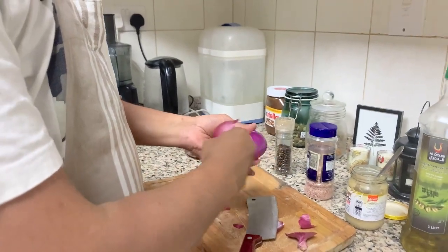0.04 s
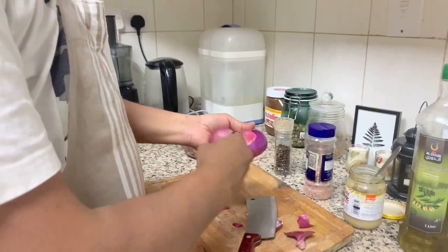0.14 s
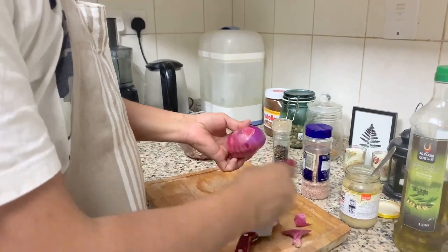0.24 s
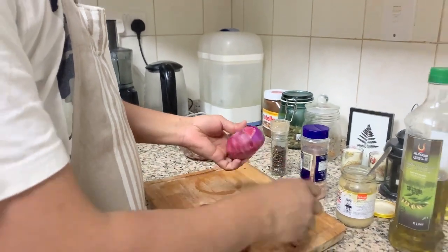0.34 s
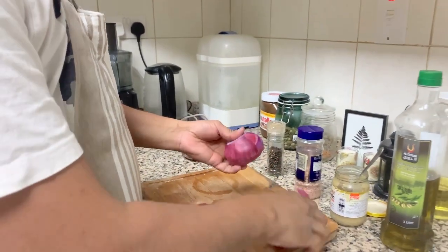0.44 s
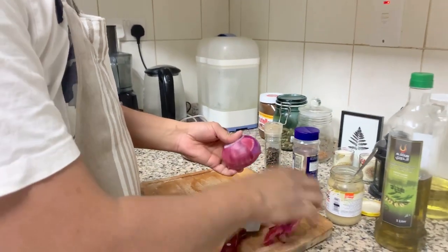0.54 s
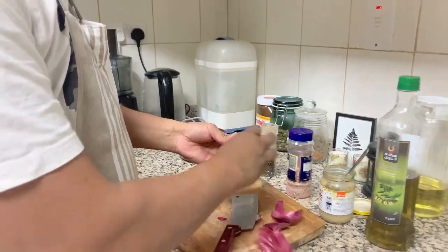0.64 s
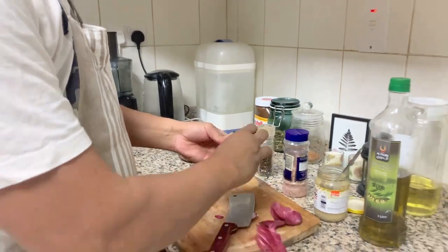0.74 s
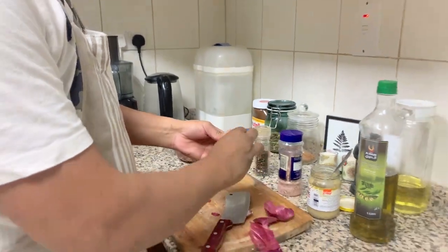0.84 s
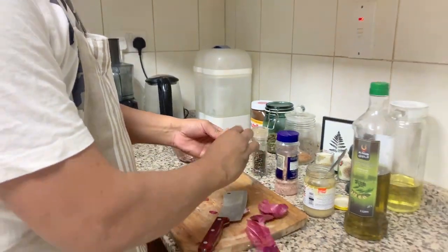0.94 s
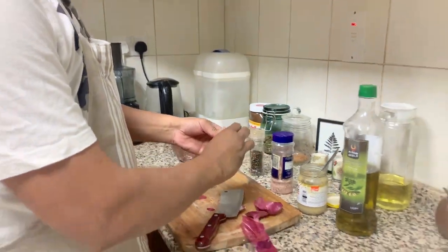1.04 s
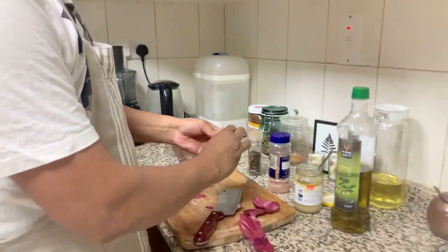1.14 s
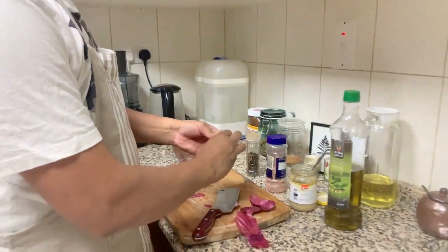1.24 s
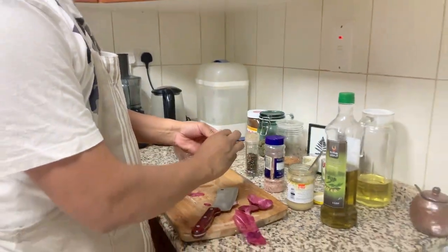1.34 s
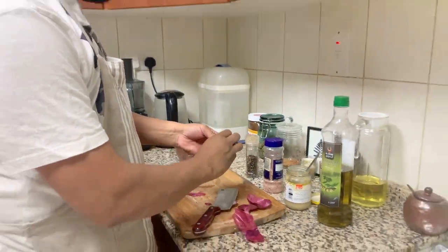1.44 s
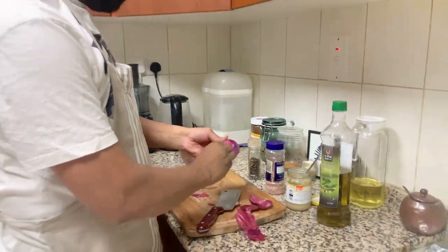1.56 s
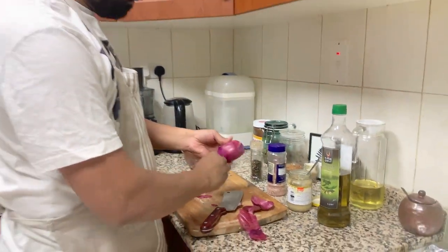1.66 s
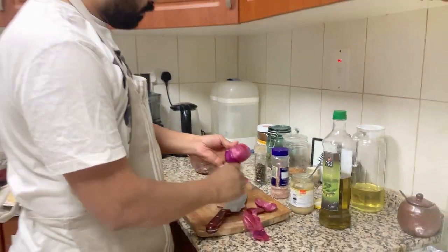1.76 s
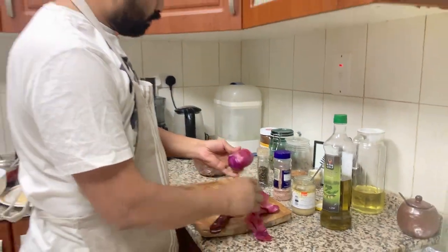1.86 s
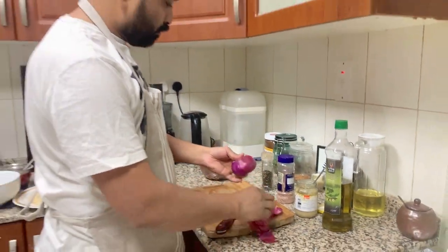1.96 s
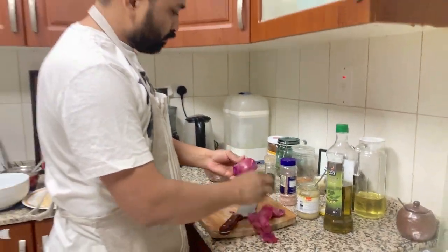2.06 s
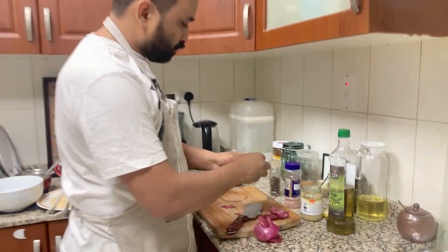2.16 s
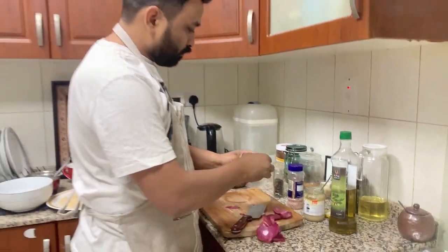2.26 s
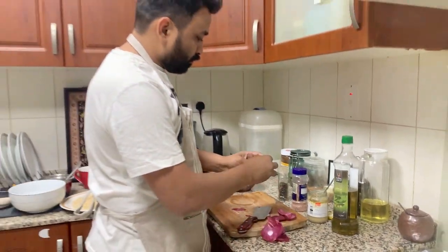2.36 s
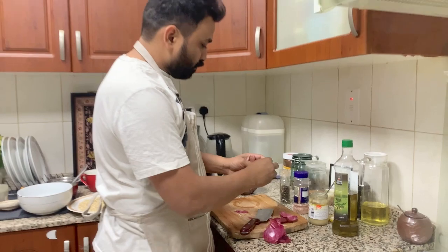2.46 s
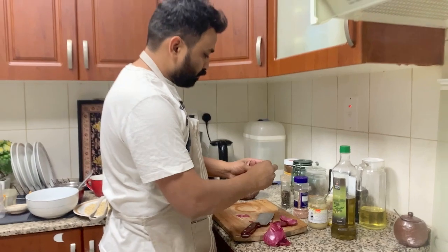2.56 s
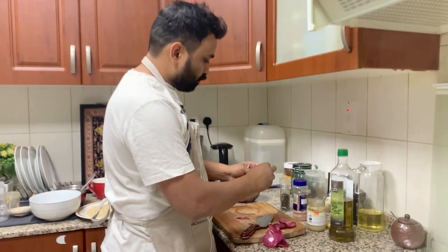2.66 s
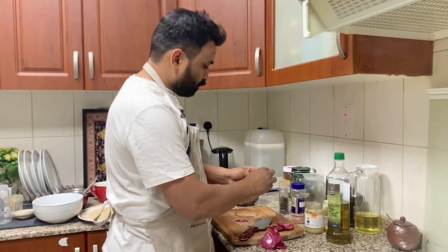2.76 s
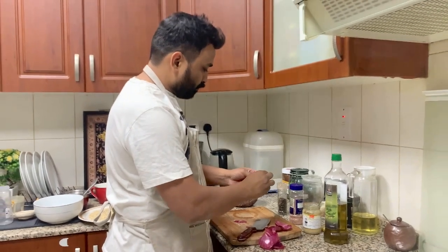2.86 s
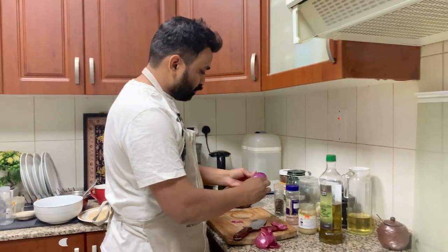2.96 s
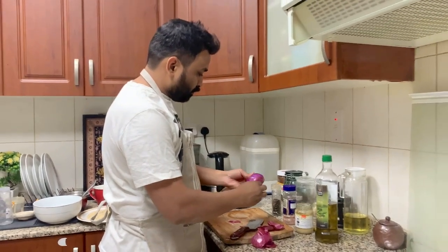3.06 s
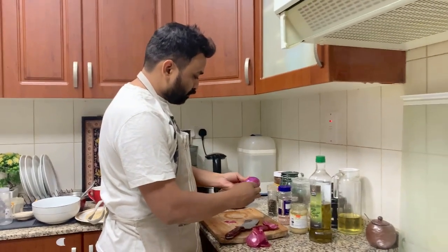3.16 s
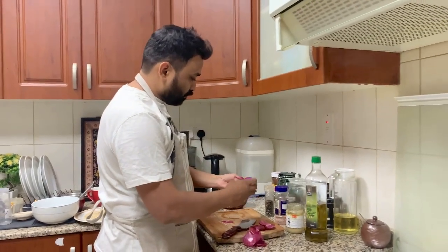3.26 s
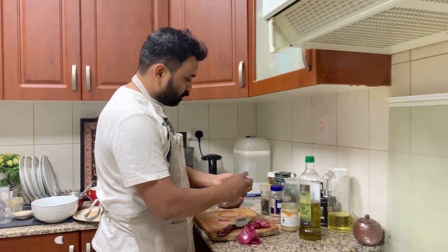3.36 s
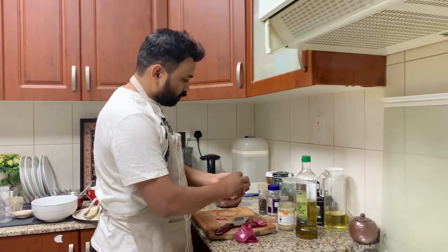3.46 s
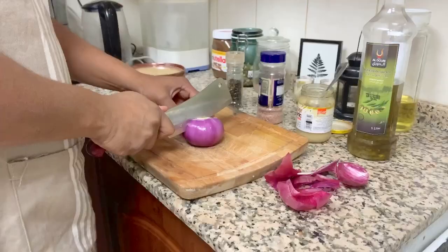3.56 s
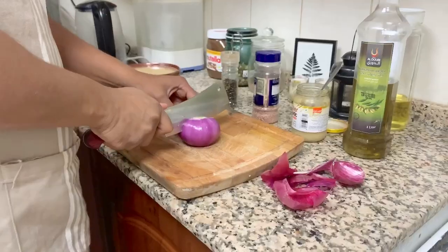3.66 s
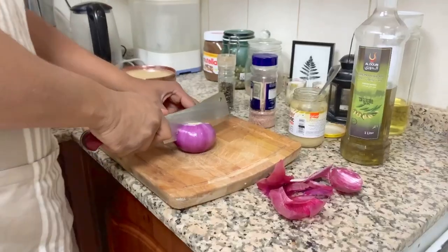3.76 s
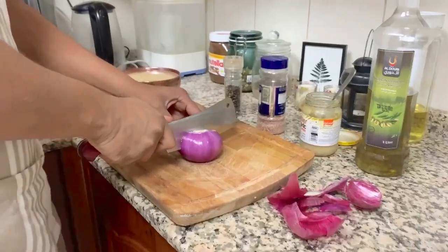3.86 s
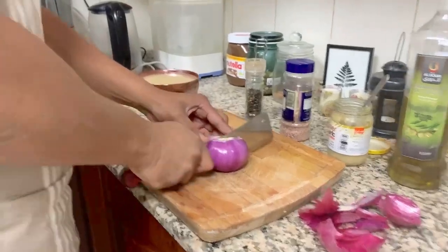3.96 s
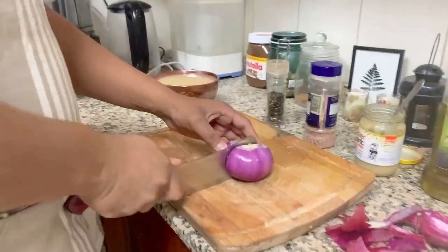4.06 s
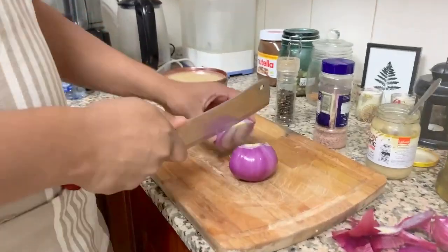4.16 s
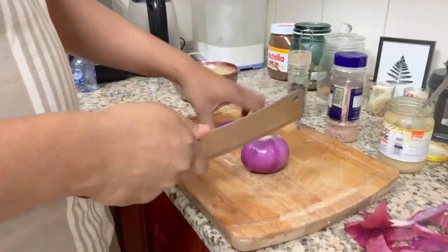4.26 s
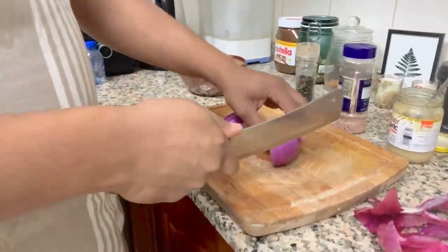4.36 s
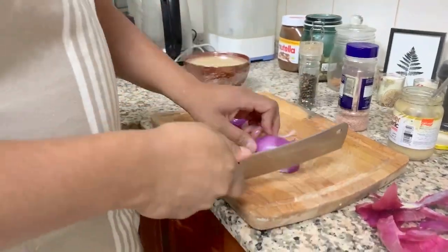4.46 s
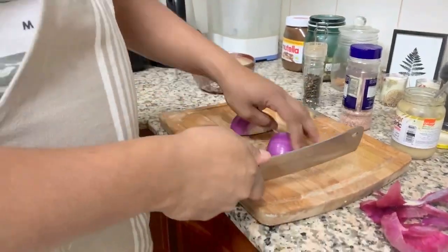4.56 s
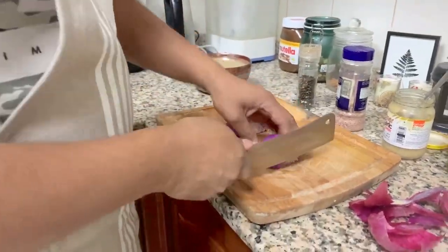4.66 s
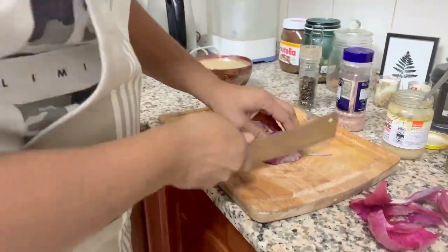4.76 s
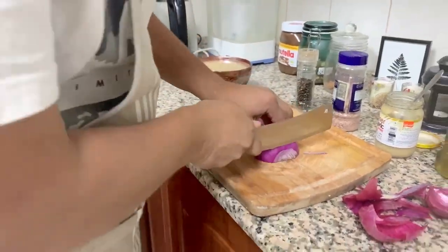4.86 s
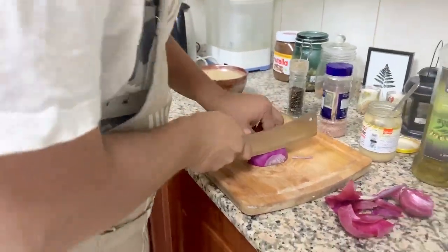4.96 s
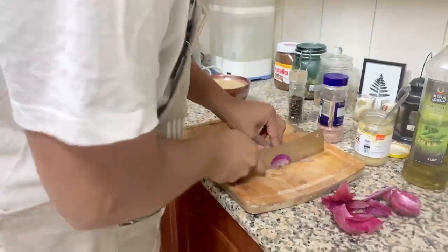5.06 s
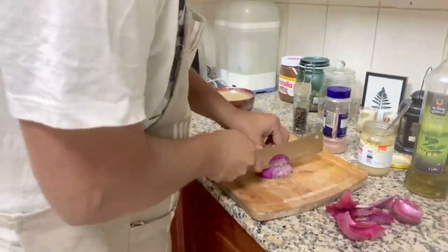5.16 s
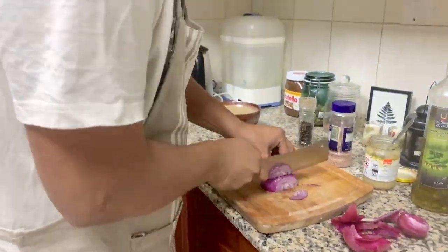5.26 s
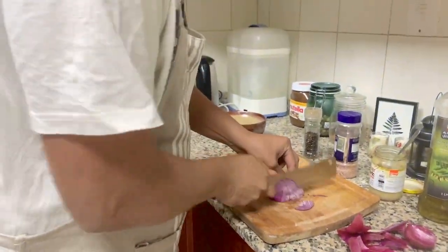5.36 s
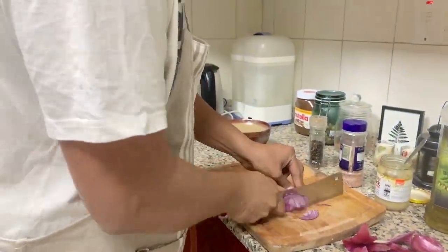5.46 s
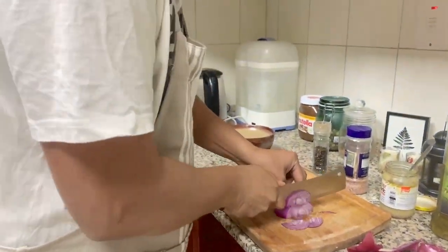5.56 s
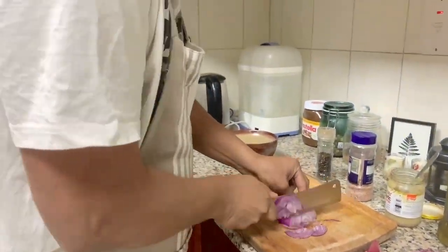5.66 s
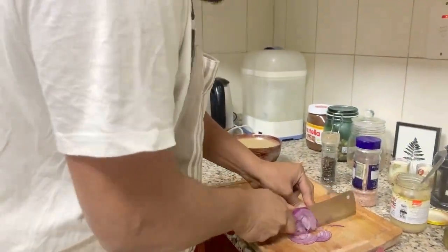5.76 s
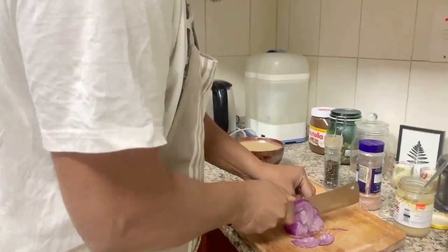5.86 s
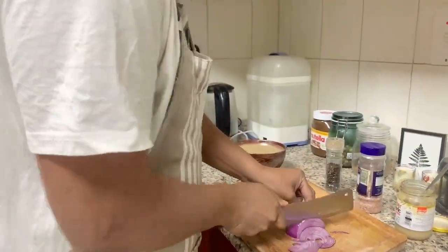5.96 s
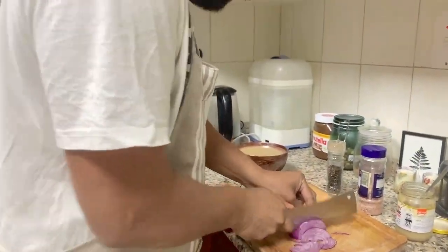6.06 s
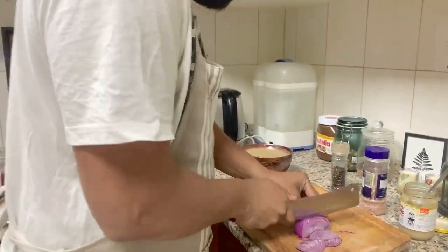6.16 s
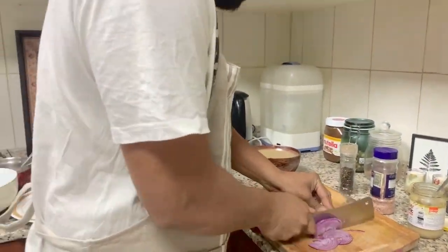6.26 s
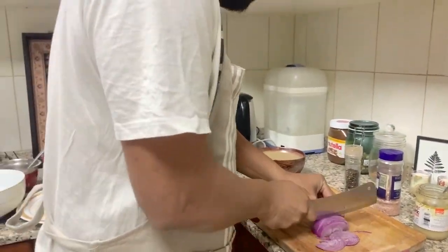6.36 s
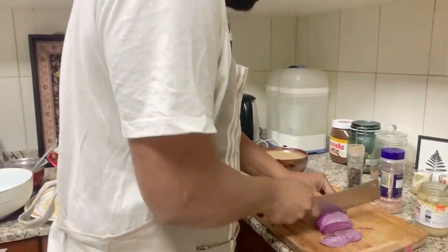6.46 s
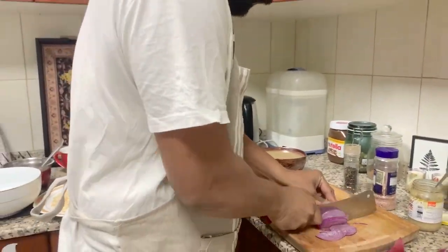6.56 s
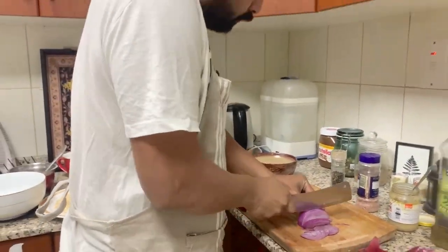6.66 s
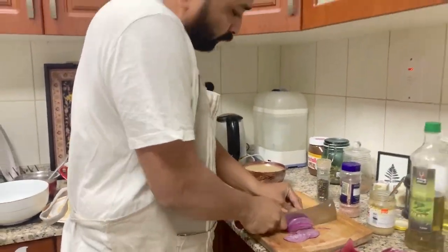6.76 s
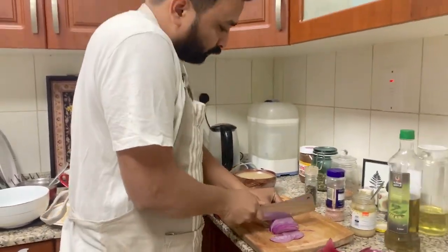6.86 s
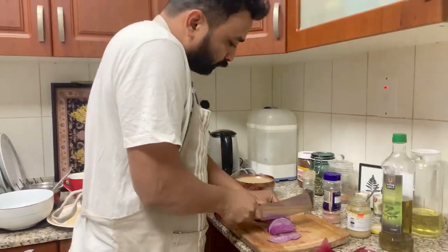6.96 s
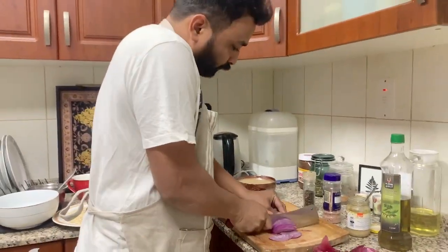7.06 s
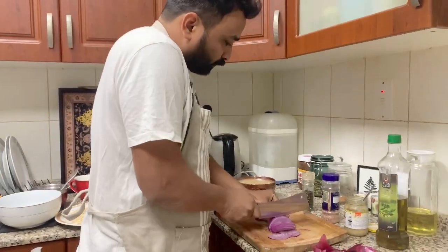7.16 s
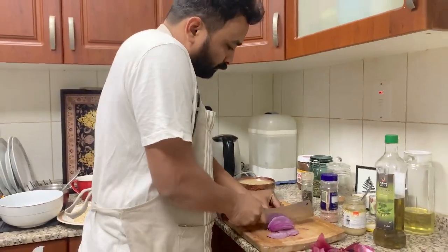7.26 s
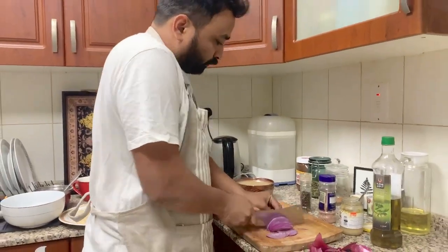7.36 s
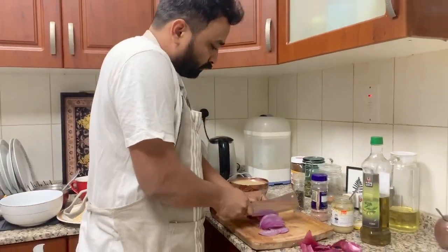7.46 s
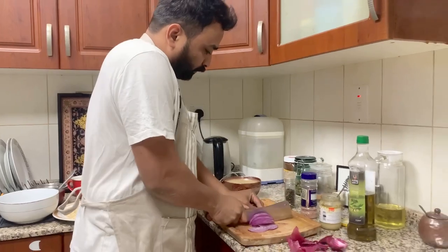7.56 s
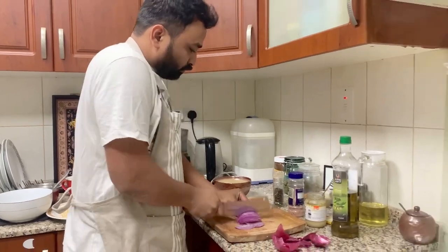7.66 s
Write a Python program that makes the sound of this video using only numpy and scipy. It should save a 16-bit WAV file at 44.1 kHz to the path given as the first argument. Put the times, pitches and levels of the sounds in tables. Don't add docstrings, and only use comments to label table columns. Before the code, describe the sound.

From 0 to 3.4 seconds, a small hard-walled kitchen carries a steady low fan hum and airy hiss. Dry onion skin gives small flaky cracks at the start, a sharp snap near 0.5, then a cluster of loud snaps and grainy tearing around 1.4 to 1.5. Sparser, mostly faint crackles follow, with clearer ones near 2.4 and 3.25. Silence falls briefly at 3.45 to 3.5, then closer, drier room air returns. Faint brushing leads to a chop at 3.8, with dull board touches there, at 3.95 and at 4.4. From 4.95 cuts come quickly, about six or seven a second: wet crunch, bright steel ring, woody thump, hardest near 5.24, 5.67 and 6.3, squashed by limiting. After 6.5 the blows slow, with tiny ticks between, at about 6.65, 6.97, 7.2 and a last one near 7.45.

```python
import sys
import numpy as np
from scipy import signal
from scipy.io import wavfile
from scipy.ndimage import uniform_filter1d

SR = 44100
rng = np.random.default_rng(int(sys.argv[2]) if len(sys.argv) > 2 else 0)


def store_pcm(level_fs):
    pcm = np.round(np.clip(level_fs, -1, 1) * 32767).astype(np.int16)
    wavfile.write(sys.argv[1], SR, np.atleast_2d(pcm).T)


def ratio(d):
    e = np.asarray(d, float) / 20
    return 10 ** e


N = 339992

# start t/s, rise t/s, fall t/s, level/dB, centre f/Hz
TEARS = [(0, .002, .031, -41.5, 4000), (0.245, .012, .006, -50.5, 4460), (0.43, .008, .006, -47.5, 4000),
         (.665, .015, .03, -60, 6000), (0.998, .01, .08, -54, 5000), (1.132, .012, .015, -57, 7000),
         (1.215, .03, .015, -53, 5960), (1.345, .04, .004, -50, 4000), (1.383, .012, .125, -30.5, 2600),
         (1.438, .045, .11, -29, 2500), (1.384, .09, .145, -34.5, 6960), (1.791, .016, .043, -55, 4970),
         (1.883, .04, .097, -55.5, 4100), (2.132, .018, .01, -60, 4460), (2.711, .043, .125, -35.5, 5360),
         (3.05, .028, .05, -63.5, 5960), (3.336, .018, .13, -48, 5250)]
# t/s, peak level/dB, ring f/Hz, share to the room level/dB
FLAKES = [
    (0.0014, -24, 1900, -4.5),
    (0.0945, -19, 2460, -7.5),
    (0.281, -35, 1930, -6),
    (0.9153, -42, 1910, 1.5),
]
# t/s, peak level/dB, flake ring f/Hz, share to the room level/dB
SNAPS = [(0.4673, -10.5, 2750, -9.5), (0.9943, -28, 2870, -11), (1.0306, -31.5, 2290, -10),
         (1.252, -42, 5700, 3), (1.3443, -34.5, 2770, 4), (1.3763, -29.5, 3820, 3), (1.3876, -7, 2600, 1),
         (1.4674, -11, 2600, 3), (1.8122, -34.5, 2850, 1), (2.1386, -42, 4740, -6), (2.4065, -19, 6200, -7),
         (3.118, -39, 7300, -3), (3.248, -17, 2300, -15), (3.3573, -26, 4530, -0.5)]
# t/s, peak level/dB, ring f/Hz, share to the room level/dB
TICKS = [
    (3.5513, -32, 9980, -3),
    (4.8738, -32, 5260, -9),
    (6.2619, -27.5, 6330, -1),
    (6.5413, -38, 6060, 0),
    (6.569, -30, 7080, -3),
    (6.8493, -33, 5087, -7),
    (6.8904, -40.5, 8206, 7),
    (7.117, -33.5, 10400, 0),
    (7.3674, -34, 10800, -3),
]
# start t/s, rise t/s, fall t/s, level/dB, centre f/Hz
BRUSHES = [
    (3.605, .016, .018, -45, 11000),
    (3.678, .014, .01, -48.5, 8500),
    (3.735, .02, .04, -50, 2800),
    (3.918, .026, .016, -41.5, 6900),
    (4.374, .006, .022, -49, 7000),
    (4.428, .016, .016, -53, 10000),
]
# start t/s, crunch level/dB, centre f/Hz, board load level/dB
CUTS = [(3.806, -36, 9000, -57), (4.942, -27, 6500, -30.5), (5.07, -34, 7000, -38), (5.19, -50, 13000, -37),
        (5.222, -26.5, 6500, -27), (5.335, -32, 8500, -35), (5.46, -35, 8700, -36.5),
        (5.48, -26.5, 7000, -28.5), (5.628, -38, 8300, -43), (5.778, -30.5, 7500, -33),
        (5.945, -31.5, 7500, -38.5), (6.108, -28, 12000, -31), (6.26, -39, 9000, -54),
        (6.286, -29.5, 7120, -32), (6.42, -31.5, 8500, -35.5), (6.598, -28.5, 11000, -33),
        (6.918, -31.5, 11000, -37), (7.135, -33.5, 8000, -37), (7.385, -35, 8000, -39)]
# t/s, steel ring level/dB, wood knock level/dB, edge tick level/dB
CHOPS = [(3.8324, -16, -34, -22.5), (4.9628, -10.5, -27, -25.5), (5.103, -16, -26, -20.5),
         (5.238, 4, -23.5, -2.5), (5.3772, -22, -26.5, -23.5), (5.4986, -6.5, -27, -21),
         (5.667, -1, -27.5, -5.5), (5.8116, -30.5, -29, -29.5), (5.9889, -15, -23, -16),
         (6.1535, -28.5, -29, -30.5), (6.3119, 2, -24, -5), (6.4728, -43, -32, -30),
         (6.6447, -23.5, -27, -19), (6.9736, -26, -29, -20), (7.21, -22, -27, -16.5),
         (7.4587, -21, -25, -18)]
# t/s, peak level/dB, pitch factor
SET_DOWN = [
    (3.834, -20, 1.6),
    (3.948, -28, .92),
    (4.379, -21, 1),
]

# f/Hz, width f/Hz, level/dB
STEEL = [(3213, 290, 2), (4110, 176, 1.5), (4400, 181, 6.5), (4550, 640, -1.5), (6470, 437, 4.5),
         (6776, 84, -3), (7990, 180, -12.5), (9980, 3400, -15.5)]
WOOD = [(495, 103, -8), (732, 173, -7), (1304, 390, -4.5), (2086, 270, -0.5), (2600, 400, 1.5),
        (3260, 700, 0), (4606, 540, 0.5), (6110, 140, -6.5)]
BOARD = [(172.2, 24.6, -4.5), (266.6, 33, -0.5), (349, 66, -8.5), (526, 90, -9.5)]
KNOCK = [(255, 66, 4), (490, 86, 6.5), (770, 154, 2), (1300, 300, -3), (2370, 700, -9)]

# f/Hz, level/dB per Hz
FAR_AIR = [(15, -58), (25, -12), (48, -7), (108, -8.5), (153, -10), (195, -23.5), (301, -13.5), (335, -29),
           (373, -21), (545, -24), (714, -25), (887, -25.5), (1290, -23), (1940, -33.5), (16000, -63)]
NEAR_AIR = [(15, -89), (25, -48), (76, -15), (130, -12), (190, -5), (285, -12), (344, -8.5), (624, -18),
            (818, -14.5), (1440, -25.5), (2110, -24.5), (3820, -27.5), (4740, -23), (6920, -34),
            (16000, -40)]
# f/Hz, level/dB
FAR_TREBLE = [(2000, -4), (4000, 0.5), (7500, 4), (9800, -6), (16000, 9)]
# f/Hz, width f/Hz, level/dB
FAR_HUM = [(50.8, 3.7, -52.5), (98, 8.9, -58), (227.4, 13.6, -62), (1277, 89, -63)]
NEAR_HUM = [(184.7, 14, -51.5), (351, 5, -57.5), (476.4, 35, -60.5), (811, 30, -68), (4100, 110, -68),
            (4670, 90, -65)]
# f/Hz, t/s
FAR_ROOM = [(200, 0.49), (1000, 0.57), (3000, 0.45), (7000, 0.43), (14000, 0.13)]
NEAR_ROOM = [(200, 0.17), (1000, 0.18), (3000, 0.15), (7000, 0.16), (14000, .14)]
# t/s, level/dB
ECHOES = [(.0052, -4), (.0081, -8), (0.0127, -6.5), (.016, -12), (.0215, -15)]
# start t/s, end t/s
GAP = (3.445, 3.502)


def evened(x):
    return x / np.sqrt(np.mean(x ** 2) + 1e-20)


def blend(parts):
    return sum(ratio(db) * x / np.linalg.norm(x) for db, x in parts)


def read(points, hz):
    f, value = np.transpose(points)
    return np.interp(np.log(hz + 1), np.log(f + 1), value)


def add(mix, s, sound):
    part = mix[max(round(s * SR), 0):][:len(sound)]
    part += sound[:len(part)]


def lay_out(sounds):
    direct, feeds = np.zeros(N), np.zeros((3, N))
    for k, (s, (near, wet)) in enumerate(sounds):
        add(direct, s, near)
        add(feeds[k % len(feeds)], s, wet)
    return direct, feeds


def resonate(x, hz, width):
    pole = np.exp((2j * np.pi * hz - np.pi * width) / SR)
    return 2 * signal.lfilter([1 - abs(pole)], [1, -pole], x).real


def resonate_twice(x, hz, width):
    return resonate(resonate(x, hz, width), hz, width)


def body(x, modes):
    return sum((-1) ** k * ratio(db) * resonate(x, hz, w) for k, (hz, w, db) in enumerate(modes))


def air(spectrum, treble, db, hum):
    frames, hz = N // 512 + 5, np.fft.rfftfreq(2048, 1 / SR)
    a, b, patches = rng.standard_normal((3, len(hz), frames))
    patches = uniform_filter1d(patches, size=20, axis=0)
    patches = evened(uniform_filter1d(patches, size=8, axis=1))
    colour_db = (read(spectrum, hz) + read(treble, hz))[:, None]
    z = (a + 1j * b) * ratio(colour_db + 1.7 * patches)
    wash = signal.istft(z, nperseg=2048, noverlap=1536)[1][:N]
    tones = sum(ratio(d) * evened(resonate_twice(rng.standard_normal(N), f, w)) for f, w, d in hum)
    return ratio(db - 2.5) * evened(wash) + tones


def stroke(start, loudest, end, power, hold=0):
    t = np.arange(start, end, 1 / SR)
    loudest = np.clip(loudest, start + 0.00086, end - .001)
    return np.interp(t, [start, loudest, end], [0, 1, hold]) ** power


def crackle(length, per_s, spread_db):
    size_draw, when_draw, push = rng.random((3, length))
    size = ratio(-spread_db * np.log(size_draw + 0.0101))
    return evened(size * (when_draw < per_s / SR) * (push - .5))


def rip(start, rise, fall, db, hz, width):
    shape = stroke(start, start + rise, start + rise + fall, 1.12)
    grains = resonate_twice(crackle(len(shape), 4000, 4.8), hz, 1.43 * width)
    sound = ratio(db - 4) * shape * evened(grains)
    return sound, sound


def snap(db, ring_hz, ring_db, bright_db, wet_db):
    t = np.arange(900) / SR
    click = 1. * (t == 0)
    crack = 1.1 * click + rng.standard_normal(len(t)) * np.exp(-t / .0011)
    dull = signal.butter(3, [.24 * ring_hz, 7600], "band", fs=SR)
    broad_hz = 4300 * (ring_hz / 2800) ** 0.49

    def flake(x):
        broad = signal.lfilter(*dull, resonate(resonate(x, broad_hz, 5600), broad_hz, 5400))
        ring = signal.lfilter(*dull, resonate(x, ring_hz, 560))
        edge = resonate_twice(x, 14000, 9000)
        return blend([(0, broad), (ring_db, ring), (bright_db + 4, edge)])

    near, clean = flake(crack), flake(click)
    near *= ratio(db + 1.0) / abs(near).max()
    return near, ratio(wet_db) * clean * np.linalg.norm(near) / np.linalg.norm(clean)


def peeling():
    sounds = [(row[0], rip(*row, width=.92 * row[-1])) for row in TEARS]
    for s, db, hz, wet_db in FLAKES:
        sounds.append((s, snap(db, hz, 11, -30, wet_db)))
    for s, db, hz, wet_db in SNAPS:
        ring_db = -4.5 + 1.5 * np.log2(hz / 2800)
        edge_db = -27 - .4 * db
        sounds.append((s, snap(db, hz, ring_db, edge_db, wet_db)))
    return lay_out(sounds)


def cut(start, db, hz, load_db):
    end = min(row[0] for row in CHOPS if row[0] > start)
    loudest = start + 0.0061 + .3 * (end - start)
    shape = stroke(start, loudest, end, 0.4, hold=0.34)
    time_left = np.arange(len(shape))[::-1] / SR
    rush = ratio(3.7 * np.exp(-time_left / 0.013))
    grains = crackle(len(shape), 9000, 4.7)
    wet_layers = evened(resonate(grains, hz, 9470)) + 0.091 * evened(body(grains, STEEL))
    crunch = ratio(db - 2.5) * shape * rush * wet_layers
    load = ratio(load_db + 1.0) * shape * evened(body(grains, BOARD))
    return crunch + load, 0.51 * crunch + 0.25 * load


def chop(steel_db, wood_db, tick_db):
    t = np.arange(6000) / SR
    board_db = -6.5 + .7 * wood_db + .33 * tick_db
    chatter, rocking = rng.standard_normal((2, len(t)))
    blow = 1. * (t == 0)
    rough_blow = chatter * np.exp(-(t / 0.0028) ** 4) * np.minimum(t / 0.00026, 1) + np.roll(blow, 8)
    push = np.exp(-((t - .003) / 0.00051) ** 2) + .5 * rocking * np.exp(-t / 0.0063)
    soft = signal.butter(4, 6600, fs=SR)
    thin = signal.butter(4, 2750, "high", fs=SR)
    top = signal.butter(2, [7000, 12500], "band", fs=SR)

    def struck(x):
        return blend([(steel_db + 20.5, signal.lfilter(*thin, body(x, STEEL))),
                      (wood_db + 32, signal.lfilter(*soft, body(x, WOOD))),
                      (board_db + 25, body(push, BOARD)),
                      (tick_db + 15.5, signal.lfilter(*top, resonate(x, 7600, 8700)))])

    return ratio(6.5) * struck(rough_blow), struck(blow)


def knock(db, pitch):
    t = np.arange(3000) / SR
    modes = [(pitch * hz, 1.3 * pitch * width, mode_db) for hz, width, mode_db in KNOCK]
    touch = rng.standard_normal(len(t)) * np.exp(-t / 0.0043) * np.minimum(t / 0.0012, 1)
    sound = body(touch, modes)
    sound *= ratio(db) / abs(sound).max()
    return sound, 0.48 * sound


def cutting():
    sounds = [(row[0], rip(*row, width=0.72 * row[-1])) for row in BRUSHES]
    sounds += [(row[0], cut(*row)) for row in CUTS]
    sounds += [(s, chop(*row)) for s, *row in CHOPS]
    sounds += [(s, knock(*row)) for s, *row in SET_DOWN]
    for s, db, hz, wet_db in TICKS:
        ring_db = -6 + 13 * np.log2(hz / 6500)
        sounds.append((s, snap(db, hz, ring_db, 4, wet_db)))
    return lay_out(sounds)


def room(direct, feeds, decays, gap_s, wet_db, echo_db):
    paths, length = len(feeds), SR // 2
    at = np.arange(round(gap_s * SR), length - 8, 8) + rng.integers(0, 8, (paths, 1))
    at = np.minimum(at + rng.integers(0, 8, at.shape), length - 1)
    taps = np.zeros((paths, length))
    np.put_along_axis(taps, at, rng.choice([-1., 1.], at.shape), 1)
    hz, t, z = signal.stft(taps, SR, nperseg=128)
    fade = ratio(-60 * t / read(decays, hz)[:, None])
    tails = signal.istft(z * fade, SR, nperseg=128)[1]
    tails /= np.linalg.norm(tails, axis=1)[:, None]
    for s, db in ECHOES:
        for tail in tails:
            add(tail, s * rng.uniform(.9, 1.1), ratio(db + echo_db) * np.ones(1))
    wet = signal.fftconvolve(feeds, tails, axes=1)[:, :N].sum(0)
    return direct + ratio(wet_db) * wet


def scene():
    t = np.arange(N) / SR
    skin = room(*peeling(), FAR_ROOM, gap_s=.003, wet_db=4.6, echo_db=-6.5)
    skin = signal.lfilter(*signal.butter(2, 520, "high", fs=SR), skin)
    knife = room(*cutting(), NEAR_ROOM, gap_s=.004, wet_db=5.0, echo_db=-1.3)
    knife = signal.lfilter(*signal.butter(4, 125, "high", fs=SR), knife)
    far = skin + air(FAR_AIR, FAR_TREBLE, -48, FAR_HUM)
    near = knife + air(NEAR_AIR, [(0, 0)], -47, NEAR_HUM)
    far_fade = np.clip((GAP[0] - t) / 0.00067, 0, 1)
    near_fade = np.clip((t - GAP[1]) / 0.0091, 0, 1)
    return (far * far_fade + near * near_fade)[None]


def excess(level_db, limit_db, release_db_s):
    fall = np.arange(N) * release_db_s / SR
    held_db = np.maximum.accumulate(level_db + fall) - fall
    return np.maximum(held_db - limit_db, 0)


def roll_off(x):
    return signal.sosfilt(signal.butter(12, 16970, fs=SR, output="sos"), x)


def record(dry):
    edge = signal.firwin(255, 15750, window=("kaiser", 8), fs=SR)
    x = signal.oaconvolve(dry[0], edge, "same")
    lag = np.exp(-1 / (0.055 * SR))
    power_db = 10 * np.log10(uniform_filter1d(x ** 2, size=200) + 1e-12)
    slow_db = excess(power_db, limit_db=-22.5, release_db_s=110.0)
    x = x / ratio(0.19 * signal.lfilter([1 - lag], [1, -lag], slow_db))
    peak_db = 20 * np.log10(abs(x) + 1e-9)
    quick_db = excess(peak_db, limit_db=-0.97, release_db_s=770.0)
    x = x / ratio(1.005 * uniform_filter1d(quick_db, size=24))
    soft = .95 * np.tanh(x / .95)
    smooth = signal.oaconvolve(soft, edge, "same")
    mix = smooth + ratio(-14) * (soft - smooth)
    return roll_off(mix[None])


dry = scene()
out = record(dry)
store_pcm(out)
```